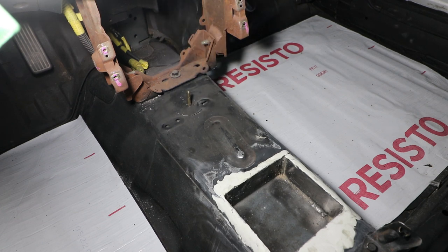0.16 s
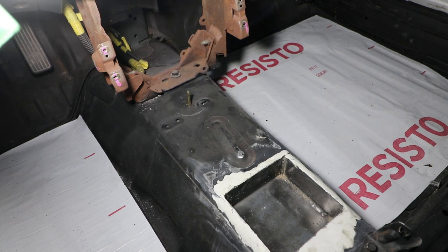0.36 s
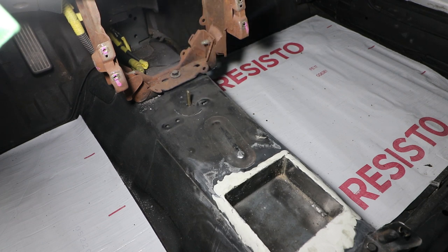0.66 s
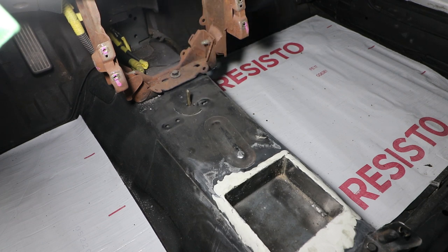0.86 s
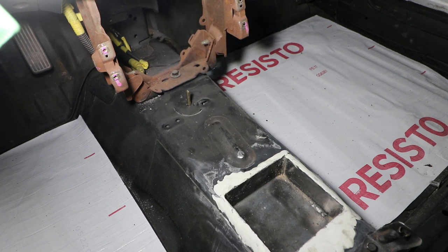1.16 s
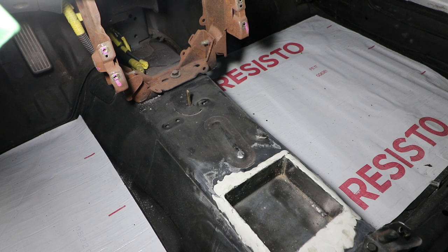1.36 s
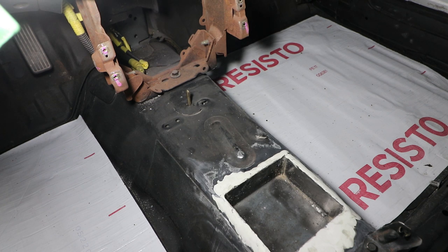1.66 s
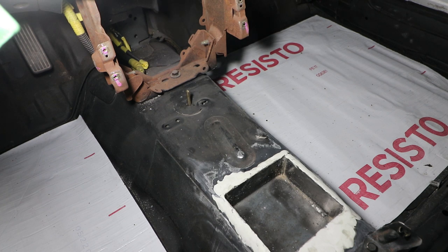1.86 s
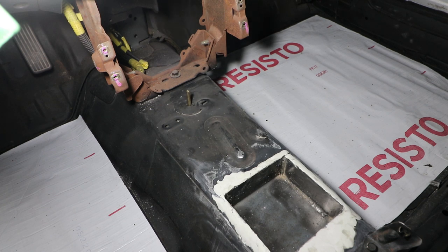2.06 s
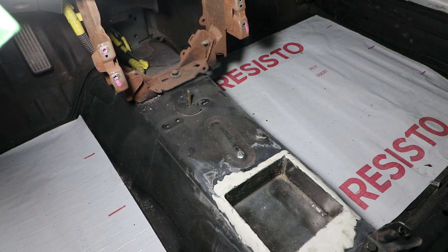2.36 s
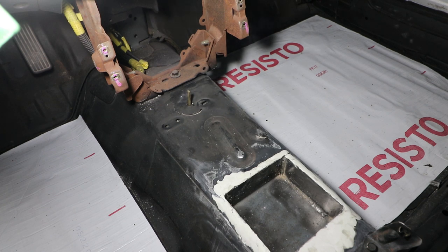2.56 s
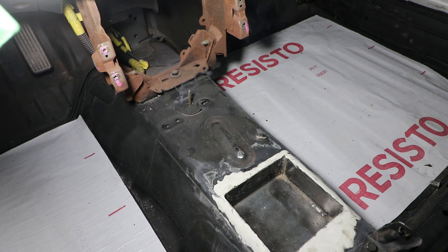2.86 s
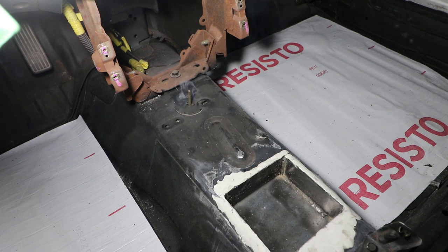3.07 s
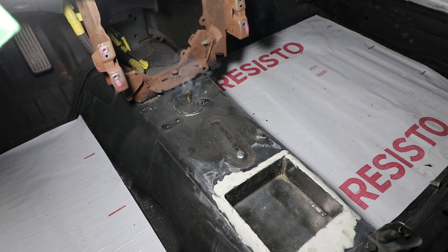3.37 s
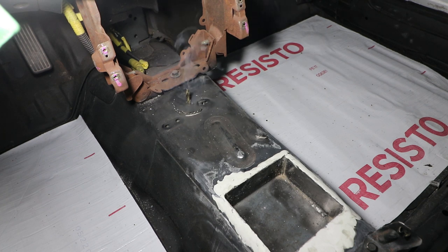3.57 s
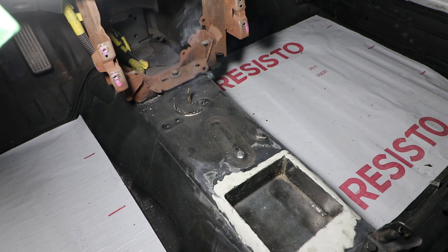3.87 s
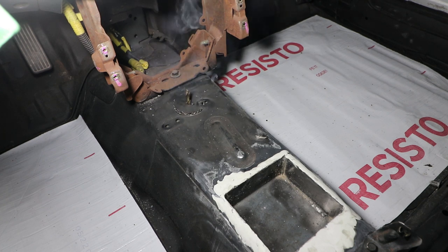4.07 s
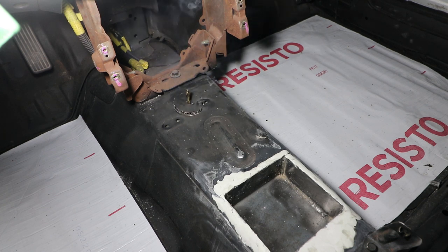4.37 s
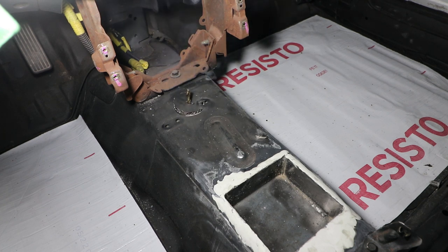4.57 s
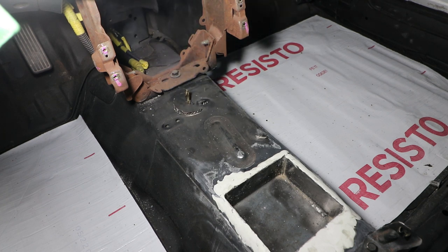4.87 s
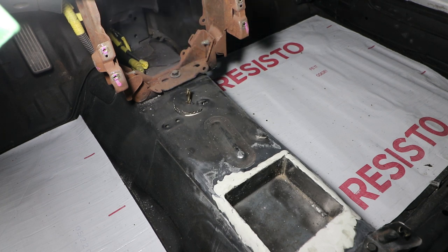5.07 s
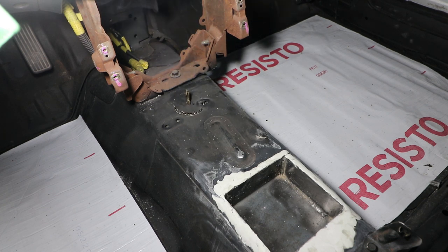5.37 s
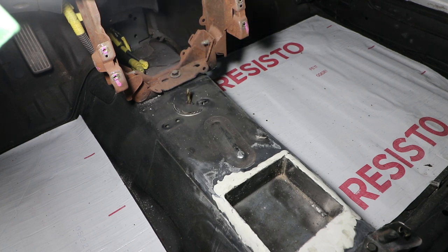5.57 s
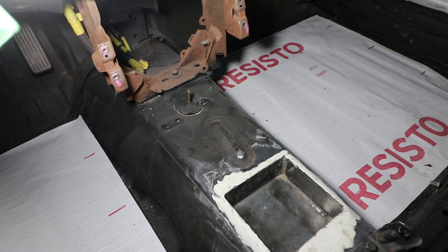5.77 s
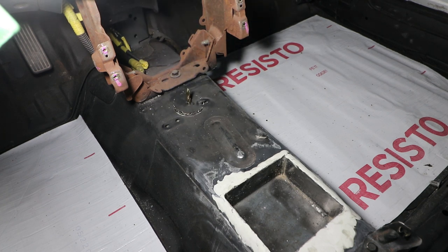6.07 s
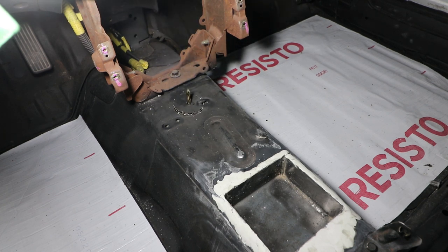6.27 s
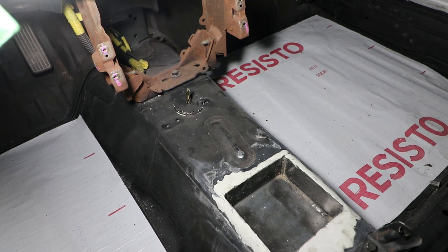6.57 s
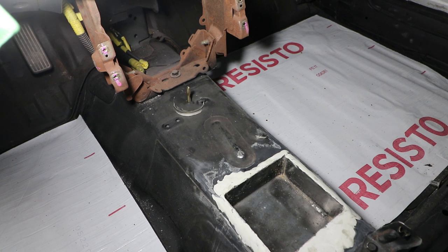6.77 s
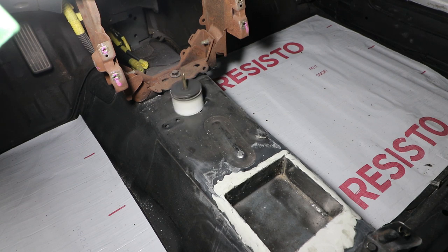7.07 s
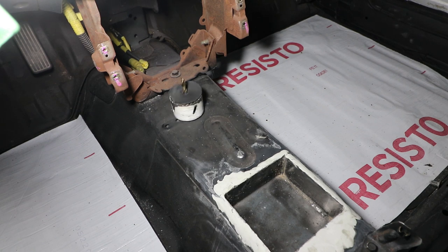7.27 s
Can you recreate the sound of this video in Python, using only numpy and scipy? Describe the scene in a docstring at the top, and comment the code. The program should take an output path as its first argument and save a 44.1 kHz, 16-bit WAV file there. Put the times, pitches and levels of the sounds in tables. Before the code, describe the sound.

Heard from inside a stripped car cabin in a garage, a hole saw chews up through the sheet-metal floor. The harsh rasp drums the panel, judders and picks up rough squeals before stopping at about three seconds. Knocks, scrapes and a faint drill whine follow as the saw is reseated, then a short spurt, a pause with clanks, and a final cut ending in bright metallic taps. Mono, fairly close, slight room reverberation.

```python
"""A hole saw on a power drill cuts up through a car's sheet-metal floor: one long cut, then two short spurts.
Teeth are grain noise through a chip spectrum, pinched cup modes and floor-panel modes; catches add judder.
The cup squeals in the kerf as a rough gliding sine and rings as decaying modes once it breaks through.
Knocks as the saw is reseated are impulses and crunches; single notes of the panel ring on after some blows.
Between cuts the drill whines and groans faintly. Mono, inside the stripped cabin, in a garage."""
import sys
import numpy as np
from scipy import signal
from scipy.fft import rfft, irfft
from scipy.io import wavfile
from scipy.ndimage import uniform_filter1d

SR = 44100
rng = np.random.default_rng(int(sys.argv[2]) if len(sys.argv) > 2 else 0)


def dump(signal):
    """Clip the signal to [-1, 1] and save it as 16-bit WAV at the path in sys.argv[1]."""
    limited = np.clip(np.atleast_2d(signal).T, -1, 1)
    pcm = np.round(limited * 32767).astype(np.int16)
    wavfile.write(sys.argv[1], SR, pcm)


N = 326765
T_S = np.arange(N) / SR

# Event levels are before the trims in the functions; spectra and mode levels are relative.
# Low rumble of the car body: time_s, level_db
RUMBLE_LEVEL = [(0, -47), (1.5, -42.5), (3.3, -65.5), (3.7, -65.5), (4.7, -60), (5.55, -48), (5.8, -59),
                (6.48, -50), (6.65, -51), (7.41, -40)]
# Rumble spectrum: freq_hz, density_db_per_hz
RUMBLE_SPECTRUM = [(20, -15.5), (50, 0), (100, 4), (150, -5.5), (300, -13.5), (1000, -92)]
# Car body leaned on and rubbing: start_s, length_s, level_db
BODY_RUBS = [(3.55, 0.39, -56), (4.37, 0.24, -55), (4.708, 0.475, -32), (5.15, 0.56, -41),
             (5.9, 0.85, -45.5)]
# Still-air spectrum: freq_hz, density_db_per_hz
AIR_SPECTRUM = [(30, 2.5), (70, 10), (150, 1), (400, 13.5), (800, -5), (1500, -26.5), (3500, -15),
                (4800, -16), (6500, -22), (9000, -23.5), (16000, -28.5)]
# Thin-hiss spectrum: freq_hz, density_db_per_hz
HISS_SPECTRUM = [(1000, -6), (3500, -10), (4900, -4), (6200, -12), (9000, -9), (16000, -25)]
# Drill whine at a light touch of the trigger: time_s, pitch_hz, level_db
DRILL_WHINE = [(4.72, 3920, -61), (4.78, 4030, -56), (4.9, 3960, -53), (5.2, 3860, -69), (5.32, 3740, -54),
               (5.39, 3600, -61)]
# Notes of the panel or a loose part, left by a bite or blow: start_s, pitch_hz, level_db, t60_s
RINGING_NOTES = [(.882, 770, -9.5, 0.068), (1.045, 420, -14, 0.031), (1.1, 430, -15.5, 0.056),
                 (1.184, 1223, -13.5, 0.059), (1.267, 749, -14, 0.12), (1.68, 412, -17, .06),
                 (1.799, 792, -12, 0.1), (1.869, 833, -13, 0.074), (2.694, 450, -16.5, 0.053),
                 (2.866, 609.5, -23, .08), (3.175, 790, -9, 0.085), (3.262, 514, -21.5, 0.18),
                 (3.742, 792, -21.5, 0.066), (4.752, 763, -24, 0.081), (5.402, 774, -16, 0.23),
                 (5.483, 790, -23, 0.092), (5.49, 1524, -21, 0.055), (5.604, 723, -4.5, 0.046),
                 (5.622, 500, -5, 0.039), (5.633, 409, -4, 0.065), (6.05, 441, -28.5, 1.6),
                 (6.124, 1225, -24, .08), (6.124, 1877, -22.5, 0.088), (6.297, 1190, -26, 0.057),
                 (6.448, 668, -25, 0.054), (7.094, 720, -6, 0.042), (7.127, 770, -12, .06),
                 (7.207, 310, -15.5, 0.09), (7.249, 322, -18, 0.12)]
# Rim of the hole taps the freed cup: start_s, level_db, favoured_hz
RIM_TAPS = [(7.26, -32, 5690), (7.31, -31, 6934), (7.326, -30, 5690), (7.339, -36, 2470),
            (7.373, -19.5, 5690), (7.381, -25, 5005)]
# Free cup modes: freq_hz, level_db, t60_s
FREE_CUP_MODES = [(2470, -1, .3), (3690, -8, .25), (3854, -10, .25), (5005, -3, .22), (5249, -8, .2),
                  (5680, 0, .12), (5765, -4, .11), (6934, -6, .12), (7407, -2, .07), (8620, 0, .2),
                  (10410, -5, .06), (10950, -9, .17), (13300, -5, .14)]
# Saw knocks or jams against the floor: start_s, panel_db, crack_db
FLOOR_KNOCKS = [(3.307, -22.5, -50), (3.419, -50, -45.5), (3.576, -36, -37), (3.734, -36, -44),
                (3.742, -28, -22.5), (3.82, -33, -42), (4.145, -37, -57), (4.386, -54, -73),
                (4.459, -47, -67), (4.531, -48.5, -66), (4.57, -50.5, -64), (4.749, -17.5, -36),
                (4.813, -25, -39), (4.83, -24.5, -56), (4.91, -15, -39), (4.917, -6.5, -11),
                (5.001, -26, -34), (5.048, -28, -41), (5.078, -17, -41), (5.108, -23, -30.5),
                (5.144, -23, -42), (5.242, -24, -52), (5.343, -31, -43), (5.401, -18.5, -33),
                (5.463, -26, -40), (5.481, -18.5, -42), (5.49, -17.5, -35), (5.604, -6, -26),
                (5.622, 0.5, -8.5), (5.634, -7, -15), (6.122, -15.5, -23.5), (6.297, -26.5, -38),
                (6.31, -27, -49), (6.376, -29, -44), (6.451, -32, -44), (6.752, -8.5, -28),
                (6.769, -4, -13), (6.777, -1, -7.5)]
# Crack of hard contact, spectrum: freq_hz, density_db_per_hz
CRACK_SPECTRUM = [(200, -48), (900, -2), (1700, -16), (3000, 11.5), (5000, 12.5), (8000, 0), (11000, -3),
                  (16000, -3.5)]
# Cup edge clacking on steel, spectrum: freq_hz, density_db_per_hz
CLACK_SPECTRUM = [(300, -27), (900, -0.5), (1200, -4.5), (1700, -6.5), (2600, -5), (4000, -13), (8000, -17),
                  (11000, -30.5), (16000, -35)]
# Cup rubs without cutting: start_s, length_s, level_db
CUP_SLIDES = [(3.555, 0.047, -43), (3.73, 0.13, -43), (4.92, 0.31, -42), (5.24, 0.12, -39.5),
              (5.9, 0.33, -32.5), (6.38, 0.13, -40), (7.25, 0.33, -37.5)]
# Sliding spectrum: freq_hz, density_db_per_hz
SLIDE_SPECTRUM = [(200, -7.5), (450, 6.5), (1000, -1), (2000, -4), (4000, -10), (6000, -13), (8500, -20),
                  (10500, -33), (16000, -52)]
# Cup squeals in the kerf: start_s, hold_s, level_db, pitch_hz
CUP_SQUEALS = [(1.76, 0.021, -26, 2600), (1.959, 0.014, -26.5, 2677), (2.093, 0.016, -26, 2596),
               (2.149, 0.017, -26.5, 2553), (2.205, 0.02, -22, 2500), (2.276, 0.022, -21.5, 2430),
               (2.418, .033, -27, 2150), (2.496, 0.028, -21.5, 2325), (2.754, .02, -26.5, 2530),
               (2.821, .009, -23, 2573), (2.875, 0.039, -30, 2224), (2.969, .018, -27.5, 2144),
               (3.069, 0.043, -26.5, 2800), (3.14, 0.041, -29.5, 2660)]
# Floor panel modes before detuning: freq_hz, level_db
FLOOR_MODES = [(262, -16), (306, 1), (350, -4), (404, -1), (435, -5), (507, 1), (560, -3), (619, 0),
               (690, -4), (735, -3), (783, 1), (822, -1), (870, -2), (999, 2), (1101, 1), (1217, 1),
               (1525, -1), (1637, -2), (1804, -3), (2085, -5)]
# Panel wash spectrum: freq_hz, density_db_per_hz
PANEL_SPECTRUM = [(30, -30), (100, -25), (150, -33.5), (230, -6.5), (300, -1), (400, 5.5), (490, -8),
                  (580, -4), (780, 11), (950, -5), (1500, -6), (2500, -15), (5000, -23.5), (16000, -71)]
# Cup resonances while pinched in the kerf: freq_hz, level_db
PINCHED_CUP_MODES = [(2270, 1), (2575, 0), (2830, -3), (3946, 0), (4248, -2), (4570, -3), (5181, -4),
                     (5689, -4), (7423, -3), (7644, -3), (8400, -4)]
# Chip-tearing spectrum: freq_hz, density_db_per_hz
RASP_SPECTRUM = [(150, -16.5), (350, 5.5), (900, 1.5), (2400, 4.5), (3100, 1.5), (3900, 4.5), (5000, 2.5),
                 (6100, -1.5), (7300, 3), (8500, 1.5), (10000, -7.5), (11300, -9.5), (12800, -7),
                 (16000, -13.5)]
# Teeth catch and judder: start_s, hold_s, panel_db, rasp_db
TEETH_CATCHES = [(0.041, 0.029, -24, -32), (0.127, 0.028, -23.5, -22.5), (0.178, 0.029, -18, -23),
                 (0.228, 0.038, -23.5, -23.5), (0.249, 0.046, -26, -32.5), (0.343, 0.038, -43, -19.5),
                 (0.39, 0.0055, -16, -42), (0.428, 0.027, -18, -22.5), (0.505, 0.044, -21, -33),
                 (0.569, 0.032, -19.5, -21), (0.633, 0.027, -20, -44), (0.753, 0.02, -18.5, -21.5),
                 (0.801, 0.016, -16, -30.5), (0.875, 0.021, -19, -24), (0.908, 0.022, -24, -28.5),
                 (0.987, 0.027, -24.5, -28.5), (1.042, 0.015, -19.5, -26), (1.104, 0.016, -21, -40),
                 (1.183, 0.013, -25.5, -32), (1.26, 0.032, -26.5, -35), (1.573, .022, -23.5, -29.5),
                 (1.618, 0.037, -21.5, -25.5), (1.673, 0.019, -19, -27), (1.8, 0.016, -21.5, -43.5),
                 (1.815, 0.051, -22.5, -33.5), (1.864, 0.012, -20, -32), (2.597, 0.015, -23, -30.5),
                 (2.676, 0.021, -23, -41), (2.717, 0.013, -24.5, -39), (2.864, 0.026, -21, -45),
                 (2.928, 0.032, -25.5, -41), (3.17, 0.039, -18.5, -36.5), (3.244, 0.024, -19, -29.5),
                 (5.72, 0.025, -19, -25.5), (5.758, 0.03, -19, -19), (5.796, 0.032, -21.5, -22.5),
                 (5.875, 0.029, -15.5, -28), (6.806, 0.046, -20, -34), (6.906, 0.012, -21, -19.5),
                 (6.955, 0.022, -28.5, -21), (7.054, 0.027, -23.5, -28), (7.094, 0.01, -20.5, -39),
                 (7.133, 0.017, -27.5, -19.5), (7.212, 0.014, -22.5, -20), (7.247, 0.014, -23, -24.5)]
# Long cut: time_s, rasp_db, drum_db
LONG_CUT_LEVELS = [(0.0, -23, -17.5), (.11, -30, -25), (0.29, -23.5, -24.5), (0.41, -29, -27.5),
                   (0.7, -24.5, -23), (.96, -27, -30.5), (1.11, -24, -26.5), (1.15, -21, -38.5),
                   (1.32, -25, -27), (1.47, -20, -29.5), (1.73, -23.5, -30.5), (1.92, -26.5, -35),
                   (2.27, -23, -30.5), (2.68, -24, -26), (3.06, -22, -33), (3.17, -19, -37),
                   (3.22, -32, -23.5), (3.25, -23.5, -24), (3.291, -46.5, -38.5)]
# Two short spurts, one table each: time_s, rasp_db, drum_db
SPURT_LEVELS = [
    [(5.66, -30, -40), (5.718, -38, -31), (5.732, -27, -28), (5.826, -39, -36), (5.844, -51, -38),
     (5.868, -38, -35), (5.884, -26.5, -22), (5.915, -27, -26), (5.95, -47, -43)],
    [(6.8, -23, -34), (6.89, -29, -16), (6.92, -24.5, -12), (7.026, -36.5, -28.5), (7.102, -31, -12.5),
     (7.125, -31, -20), (7.185, -18, -29), (7.28, -32, -22.5), (7.36, -34, -27.5), (7.43, -30, -41)],
]

HISS_START_S, HISS_FADE_S = 3.91, 0.4  # fades in and stays
GROAN_S, GROAN_DB, GROAN_RISE_S, GROAN_DECAY_S = 6.445, -39, 0.03, 0.054
GROAN_START_HZ, GROAN_END_HZ, GROAN_FALL_S = 113, 32, 0.04
FREED_S, RIM_DB = 7.12, -43  # from here on the rim rubs the freed cup
CONTACT_S = 0.0065  # crunch decay at a panel level of 0 dB
LINGER_DB_PER_DB = 0.25  # dB of crunch length per dB softer
BRIGHTEST_DB, BRIGHTEN_DB_PER_DB = 1.5, 0.41  # below this level the crack loses extra level
BIND_START_S, BIND_END_S = 2.0, 3.18  # the grip tightens as the kerf deepens
BIND_START_DB, BIND_END_DB = -40.5, -32
SQUEAL_GLIDE_S = 0.0208  # slide from one note to the next
CATCH_RISE_S, CATCH_DECAY_S = 0.00066, 0.005
LARGEST_GRAIN_SPREADS = 2.0
TOP_HZ = 15850


def undb(db):
    """Decibels to gain."""
    return 10 ** (np.asarray(db) / 20)


def unit(response):
    """Scale a response to unit energy, so that white noise keeps its level."""
    return response / np.sqrt(np.sum(response ** 2))


def through(x, response):
    """Convolve x with an impulse response."""
    return signal.fftconvolve(x, response)[:N]


def noise():
    """White noise, rms 1."""
    return rng.standard_normal(N)


def colour(points, size=4096):
    """Minimum-phase response with the given spectrum, via the folded cepstrum."""
    hz, db = np.transpose(points)
    bin_hz = np.arange(size // 2 + 1) * SR / size
    log_gain = np.log(undb(np.interp(np.log(bin_hz + 1), np.log(hz), db)))
    cepstrum = irfft(log_gain)
    cepstrum[1:size // 2] *= 2
    cepstrum[size // 2 + 1:] = 0
    return unit(irfft(np.exp(rfft(cepstrum))))


def fade(t60_s):
    """One second of exponential decay, -60 dB at t60_s."""
    return np.exp(-np.log(1000) * np.arange(SR) / SR / t60_s)


def ring(modes):
    """Response of decaying sine modes, each with a random phase."""
    t = np.arange(SR) / SR
    response = np.zeros(SR)
    for hz, db, t60_s in modes:
        response += undb(db) * fade(t60_s) * np.sin(2 * np.pi * (hz * t + rng.random()))
    return unit(response)


def curve(times_s, db):
    """Gain along a level curve, silent outside it, smoothed over 5 ms."""
    inside = (T_S >= times_s[0]) * (T_S <= times_s[-1])
    return uniform_filter1d(undb(np.interp(T_S, times_s, db)) * inside, SR // 200)


def bursts(times_s, db, rise_s, decay_s):
    """Envelope that jumps up at each event and dies away."""
    out, t = np.zeros(N + SR), np.arange(SR // 4) / SR
    for start_s, gain, decay in np.broadcast(times_s, undb(db), decay_s):
        shape = (1 - np.exp(-t / rise_s)) * np.exp(-t / decay)
        i = int(start_s * SR)
        out[i:i + len(t)] += gain * shape / shape.max()
    return out[:N]


def holds(times_s, lengths_s, db):
    """Envelope that rises at each event, holds for its length and drops."""
    out, t = np.zeros(N + SR), np.arange(SR // 4) / SR
    for start_s, length_s, gain in zip(times_s, lengths_s, undb(db)):
        rise = 1 - np.exp(-t / CATCH_RISE_S)
        drop = np.exp(-np.maximum(t - length_s, 0) / CATCH_DECAY_S)
        i = int(start_s * SR)
        out[i:i + len(t)] += gain * rise * drop
    return out[:N]


def swells(rows, arch_power):
    """Strokes that swell and ebb in an arch; a lower power makes them fuller."""
    out = np.zeros(N)
    for start_s, length_s, db in rows:
        arch = np.abs(np.sin(np.pi * np.clip((T_S - start_s) / length_s, 0, 1)))
        out += undb(db) * arch ** arch_power
    return out


def taps(times_s, db):
    """One impulse per event, with the energy of 1 ms of noise at that level."""
    out = np.zeros(N)
    out[(np.asarray(times_s) * SR).astype(int)] = undb(db) * np.sqrt(SR / 1000)
    return out


def walk(rate_hz):
    """Gaussian values at rate_hz joined by straight lines."""
    steps = rng.standard_normal(N // 20)
    return np.interp(T_S * rate_hz, np.arange(len(steps)), steps)


def grains(rate_hz, spread_db):
    """Random impacts of either sign and uneven, bounded size; rms 1."""
    limit = LARGEST_GRAIN_SPREADS
    size_db = spread_db * np.clip(noise(), -limit, limit)
    x = (rng.random(N) < rate_hz / SR) * np.sign(noise()) * undb(size_db)
    return x / np.std(x)


def floor_panel(direct_db=-3, modes_db=-1.5, wash_t60_s=0.044, t60_at_1khz_s=0.055,
                detune=0.008, uneven_db=2):
    """Panel response: first push, dense wash, strong modes slightly detuned and uneven from spot to spot."""
    wash = unit(rng.standard_normal(SR) * fade(wash_t60_s))
    wash[0] += undb(direct_db)
    wash = unit(signal.fftconvolve(wash, colour(PANEL_SPECTRUM))[:SR])
    modes = []
    for hz, db in FLOOR_MODES:
        detuning, unevenness = rng.standard_normal(2)
        t60_s = t60_at_1khz_s * np.sqrt(1000 / hz)  # low modes last longer
        modes.append((hz * (1 + detune * detuning), db + uneven_db * unevenness, t60_s))
    return unit(wash + undb(modes_db) * ring(modes))


def shake(force, spots=4):
    """The contact point wanders round the hole, so the mix of panel responses keeps changing."""
    shares = np.array([walk(14) for _ in range(spots)])
    shares /= np.sqrt(np.sum(shares ** 2, axis=0))
    return sum(through(force * share, floor_panel()) for share in shares)


def garage(x, wet_db=-10, low_t60_s=0.6, half_t60_hz=8000, build_s=0.00054, bands=10):
    """Diffuse reverberation that builds up quickly; the treble dies first."""
    spectrum, hz = rfft(rng.standard_normal(SR)), np.arange(SR // 2 + 1)
    edges_hz = np.linspace(0, np.sqrt(SR / 2), bands + 1) ** 2
    tail = np.zeros(SR)
    for low_hz, high_hz in zip(edges_hz, edges_hz[1:]):
        band = irfft(spectrum * (hz >= low_hz) * (hz < high_hz), SR)
        tail += band * fade(low_t60_s / (1 + low_hz / half_t60_hz))
    build = 1 - np.exp(-np.arange(SR) / SR / build_s)
    return x + undb(wet_db) * through(x, unit(tail * build))


def thin_hiss(level_db=-67):
    """Coloured noise that fades in and stays."""
    fade_in = np.clip((T_S - HISS_START_S) / HISS_FADE_S, 0, 1)
    return undb(level_db) * fade_in * through(noise(), colour(HISS_SPECTRUM))


def body_rumble(trim_db=-4.5):
    """Dull low noise of the body as it is leaned on."""
    level = undb(trim_db) * curve(*np.transpose(RUMBLE_LEVEL))
    return level * through(noise(), colour(RUMBLE_SPECTRUM))


def air_and_rubbing(air_db=-64.5, rub_noise_db=-7, creak_db=-9):
    """Still air as steady noise; body rubs lift that noise and creak the panel with sparse grains."""
    rub = swells(BODY_RUBS, arch_power=0.32)
    creak_level = rub * undb(creak_db + 3.3 * walk(44))
    creaks = shake(creak_level * grains(rate_hz=260, spread_db=4))
    air_level = undb(air_db) + undb(rub_noise_db) * rub
    return creaks + air_level * through(noise(), colour(AIR_SPECTRUM))


def drill_whine(waver=0.00704, flutter_db=1.0):
    """Thin wavering sine between cuts."""
    time_s, hz, db = np.transpose(DRILL_WHINE)
    pitch_hz = np.interp(T_S, time_s, hz) * (1 + waver * walk(150))
    level = curve(time_s, db) * undb(flutter_db * walk(40))
    return level * np.sin(2 * np.pi * np.cumsum(pitch_hz) / SR)


def drill_groan():
    """Low sine falling in pitch as the drill comes to rest."""
    fall = np.exp(-np.maximum(T_S - GROAN_S, 0) / GROAN_FALL_S)
    pitch_hz = GROAN_END_HZ + (GROAN_START_HZ - GROAN_END_HZ) * fall
    level = bursts([GROAN_S], GROAN_DB, GROAN_RISE_S, GROAN_DECAY_S)
    return level * np.sin(2 * np.pi * np.cumsum(pitch_hz) / SR)


def ringing_notes():
    """The panel or loose metal sings on after a bite or blow: one decaying sine each."""
    out = np.zeros(N)
    for start_s, hz, db, t60_s in RINGING_NOTES:
        age_s = np.maximum(T_S - start_s, 0)
        swell = 1 - np.exp(-60 * age_s / t60_s)  # a lightly damped part is also slow to start
        decay = np.exp(-np.log(1000) * age_s / t60_s)
        out += undb(db) * swell * decay * np.sin(2 * np.pi * hz * age_s)
    return out


def freed_cup(tap_db=13, favour_db=10, chatter_db=0.5):
    """The freed cup's modes chime as the rim rubs and taps it, chattering against the steel."""
    rub = undb(RIM_DB) * (T_S > FREED_S) * grains(rate_hz=1000, spread_db=3)
    out = through(rub, ring(FREE_CUP_MODES))
    for start_s, db, favoured_hz in RIM_TAPS:
        modes = []
        for hz, mode_db, t60_s in FREE_CUP_MODES:
            favoured = abs(np.log(hz / favoured_hz)) < 0.06
            modes.append((hz, mode_db + favour_db * favoured, t60_s))
        out += through(taps([start_s], db + tap_db), ring(modes))
    return out * undb(chatter_db * walk(450))


def knocking(blow_db=-1, thud_db=-6, crack_db=-2.5, click_db=-1, clack_db=-3.0, thump_db=-13, soft_rise_s=0.00024):
    """A blow and a crunch of steel ring the panel and thump the body; harder is shorter and brighter."""
    start_s, panel_db, edge_db = np.transpose(FLOOR_KNOCKS)
    contact_s = CONTACT_S * undb(-LINGER_DB_PER_DB * panel_db)

    crunch = bursts(start_s, panel_db + thud_db, soft_rise_s, contact_s)
    thud = taps(start_s, panel_db + blow_db) + crunch * grains(rate_hz=6500, spread_db=2.5)

    treble_db = edge_db + BRIGHTEN_DB_PER_DB * (edge_db - BRIGHTEST_DB)
    crack = bursts(start_s, treble_db + crack_db, rise_s=0.00063, decay_s=contact_s)
    crack = crack * grains(rate_hz=11000, spread_db=2.5)

    clack = bursts(start_s, edge_db + clack_db, soft_rise_s, 1.19 * contact_s)
    clack = taps(start_s, edge_db + click_db) + clack * grains(rate_hz=3000, spread_db=4)

    push = bursts(start_s, edge_db + thump_db, rise_s=0.0013, decay_s=0.002)
    thump = signal.sosfilt(signal.butter(2, 25, "high", fs=SR, output="sos"), push)
    steel = through(crack, colour(CRACK_SPECTRUM)) + through(clack, colour(CLACK_SPECTRUM))
    return shake(thud) + steel + thump


def sliding(trim_db=-1):
    """The cup rubs in its groove without cutting: a softer, duller scrape of dense grains."""
    pressure = swells(CUP_SLIDES, arch_power=0.96) * undb(trim_db + 0.32 * walk(74))
    return through(pressure * grains(rate_hz=5000, spread_db=1.5), colour(SLIDE_SPECTRUM))


def squealing(trim_db=0.8, waver=0.135, rough_db=5.0, flutter_db=3):
    """The cup wall binds in the deepening kerf: rough chirps over a wandering squeal."""
    start_s, hold_s, db, hz = np.transpose(CUP_SQUEALS)
    latest = np.maximum(np.searchsorted(start_s - SQUEAL_GLIDE_S / 2, T_S) - 1, 0)
    pitch_hz = uniform_filter1d(hz[latest], int(SQUEAL_GLIDE_S * SR) + 1)
    phase = np.cumsum(pitch_hz * (1 + waver * walk(1100))) / SR
    binding = curve([BIND_START_S, BIND_END_S], [BIND_START_DB, BIND_END_DB])
    grip = binding * undb(flutter_db * walk(60)) + holds(start_s, hold_s, db + trim_db)
    return grip * undb(rough_db * walk(400)) * np.sin(2 * np.pi * phase)


def sawing(drum_db=-2, spurt_drum_db=-6.0, catch_db=0.5, catch_rasp_db=-3.0, catch_clack_db=-7,
           snap_db=-12, wobble_db=2.5, flutter_db=1.5, judder_db=2.0, snag_db=3, cup_db=-11, pinched_t60_s=0.026):
    """Teeth tear off fine chips and shake the panel; catches judder, single chips snap off."""
    rasp, drum = np.zeros(N), np.zeros(N)
    cuts = [(LONG_CUT_LEVELS, drum_db)] + [(spurt, spurt_drum_db) for spurt in SPURT_LEVELS]
    for rows, trim_db in cuts:
        time_s, rasp_level_db, drum_level_db = np.transpose(rows)
        rasp += curve(time_s, rasp_level_db)
        drum += curve(time_s, drum_level_db + trim_db)

    start_s, hold_s, panel_db, teeth_db = np.transpose(TEETH_CATCHES)
    judder = undb(judder_db * walk(350))
    catches = holds(start_s, hold_s, panel_db) * judder
    rasp_catches = holds(start_s, hold_s, teeth_db + catch_rasp_db) * judder
    drum = np.hypot(drum * undb(wobble_db * walk(45)), undb(catch_db) * catches)
    rasp = np.hypot(rasp * undb(flutter_db * walk(70)), rasp_catches)

    bite = undb(0.88 * walk(600))  # no two teeth bite equally deep
    tearing = rasp * bite * grains(rate_hz=14000, spread_db=0.5)
    rubbing = rasp * bite * grains(rate_hz=14000, spread_db=0.5)
    snaps = undb(snap_db) * np.sqrt(drum * rasp) * grains(rate_hz=72, spread_db=6.5)
    chips = through(tearing + snaps, colour(RASP_SPECTRUM))

    pinched_cup = ring([(hz, db, pinched_t60_s) for hz, db in PINCHED_CUP_MODES])
    cup = undb(cup_db) * through(rubbing, pinched_cup)
    clacking = undb(catch_clack_db) * catches * grains(rate_hz=610, spread_db=9.0)
    clacks = through(clacking, colour(CLACK_SPECTRUM))

    snags = taps(start_s, panel_db + snag_db)  # each catch starts with a jolt
    drumming = drum * bite * grains(rate_hz=900, spread_db=0.5)
    return chips + cup + clacks + shake(snags + drumming)


def scene():
    """Drill and saw in the garage over the dry background, the same on both channels."""
    background = thin_hiss() + body_rumble() + air_and_rubbing()
    drill = drill_whine() + drill_groan()
    saw = ringing_notes() + freed_cup() + knocking() + sliding() + squealing() + sawing()
    mono = garage(drill + saw) + background
    return np.array([mono, mono])


def record(dry):
    """Round the hardest peaks with tanh, then cut the top with a steep low-pass."""
    ceiling = 0.88
    rounded = ceiling * np.tanh(dry / ceiling)
    return signal.sosfilt(signal.ellip(10, 0.2, 80, TOP_HZ, fs=SR, output="sos"), rounded)


dry = scene()
out = record(dry)
dump(out)
```